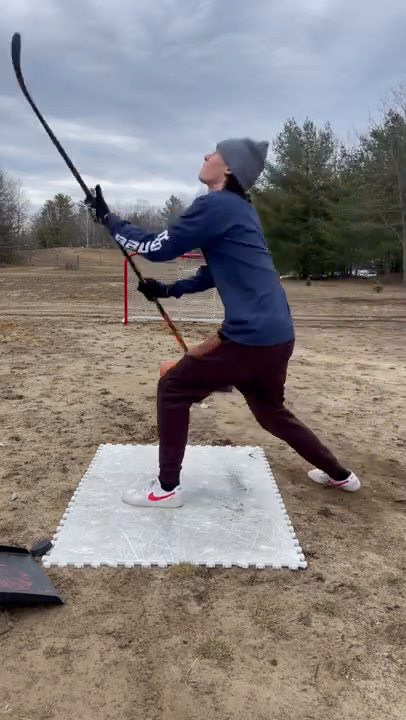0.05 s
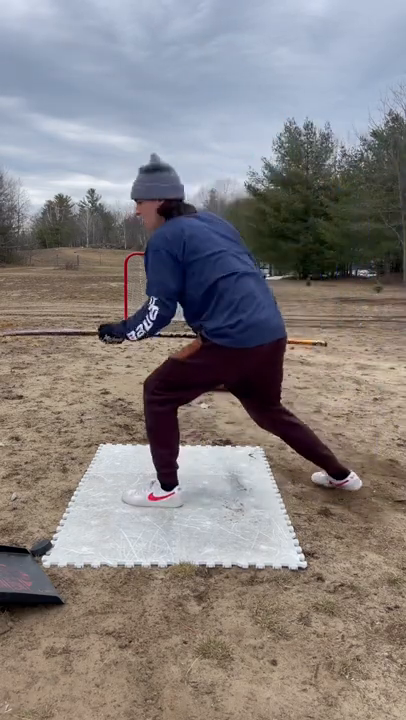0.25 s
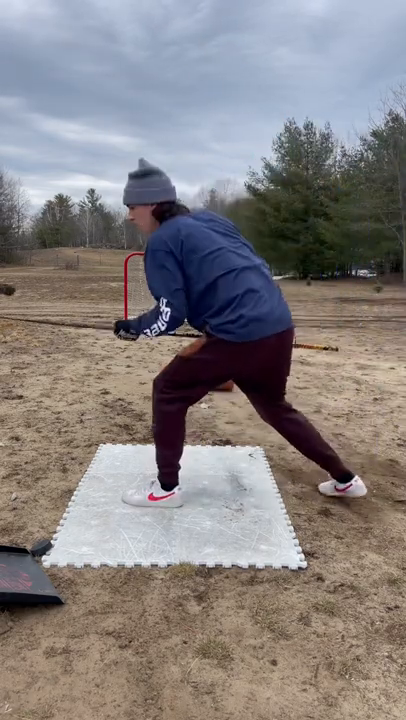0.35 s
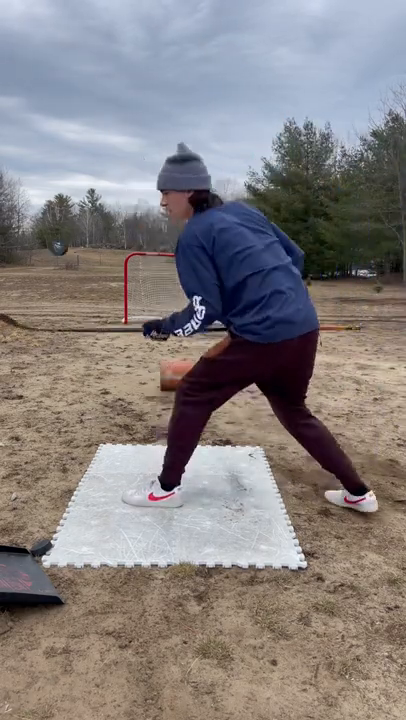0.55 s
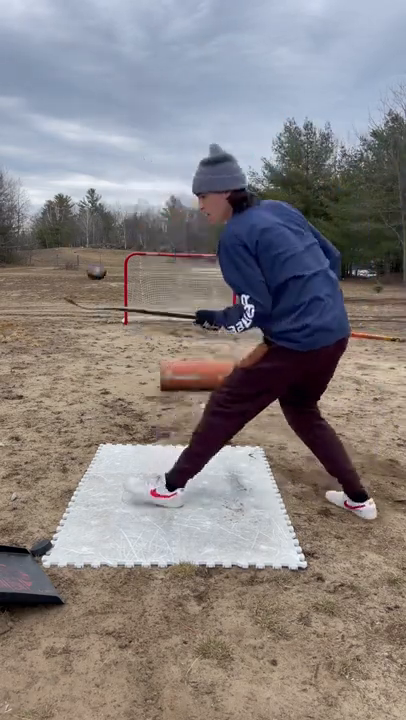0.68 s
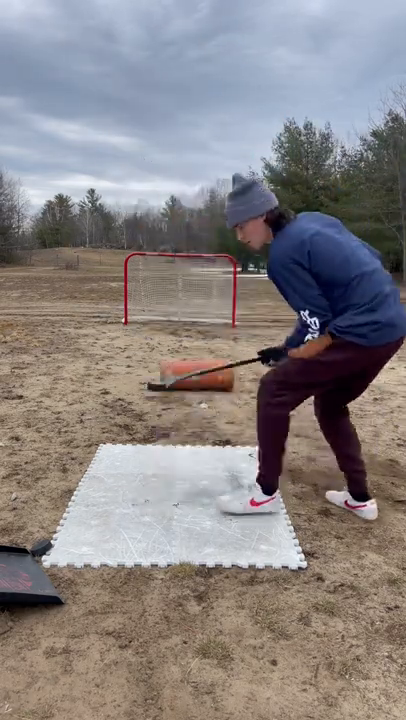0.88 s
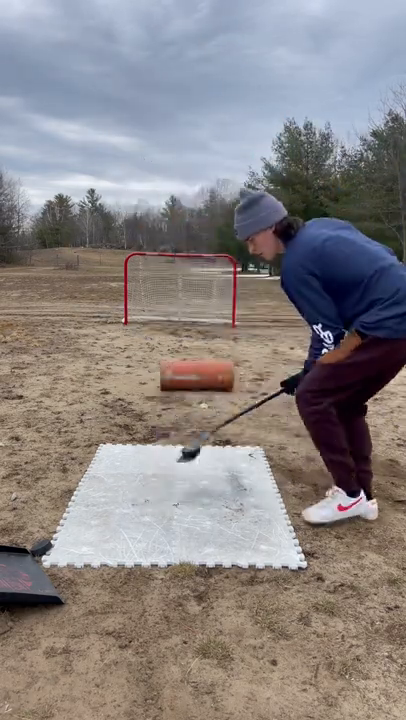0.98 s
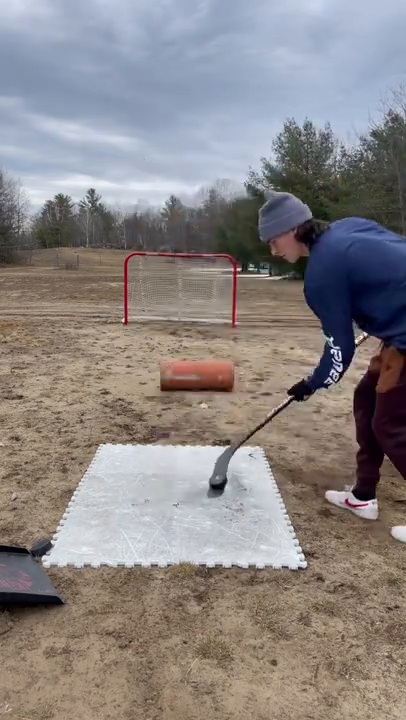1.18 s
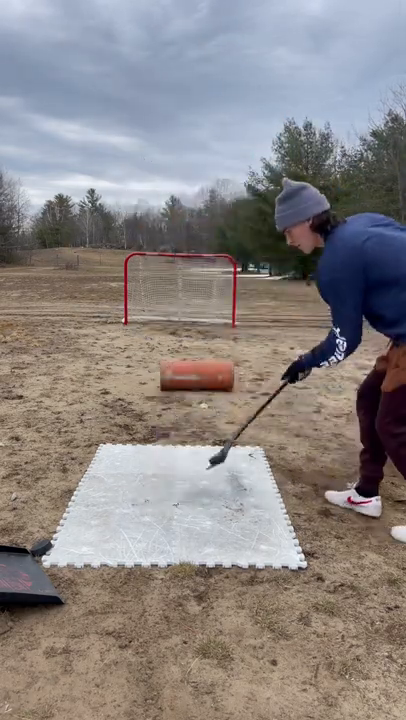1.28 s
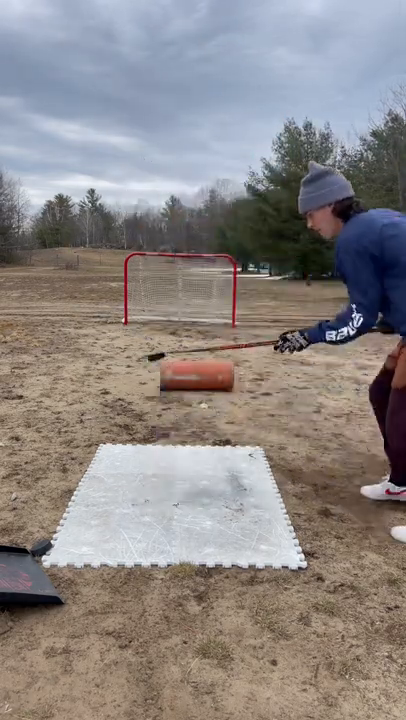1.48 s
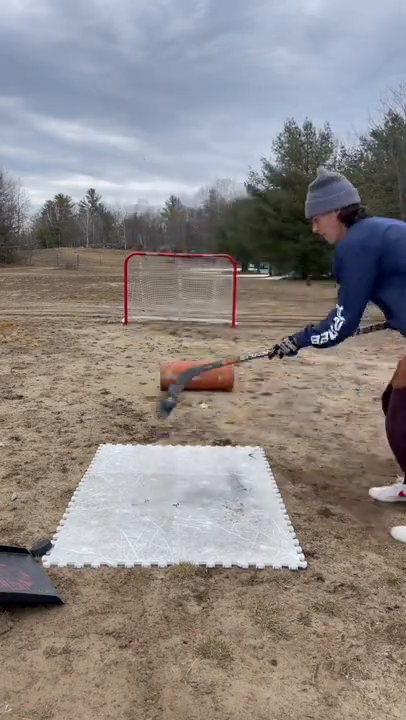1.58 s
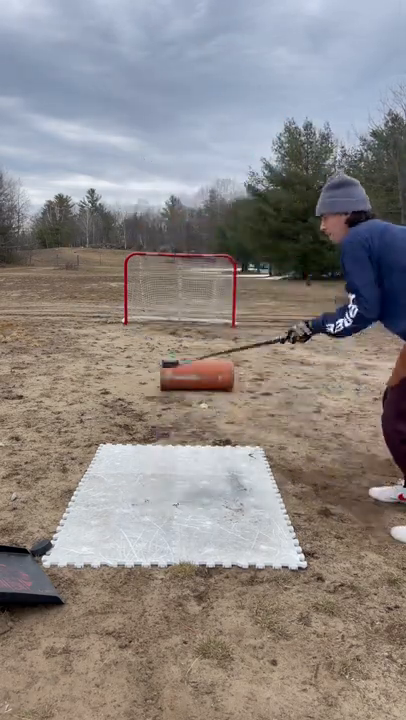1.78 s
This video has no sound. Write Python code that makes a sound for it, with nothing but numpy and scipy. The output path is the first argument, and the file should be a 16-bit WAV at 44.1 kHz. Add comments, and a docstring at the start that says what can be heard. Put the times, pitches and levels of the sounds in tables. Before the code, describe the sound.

A hockey stick hits a puck with a sharp double crack close to the microphone, then gives a lighter clack. The knocks echo briefly across an open field, with faint clothing rustle and low wind on the microphone.

```python
"""Stick and puck in an open field

Close to the microphone, a hockey stick bats a puck in the air: a hard double crack, then a lighter
clack as the blade meets it again. Each knock rings the stick and scatters off ground and trees.
Clothes and shoes rustle as the player turns. Low wind buffets the microphone over a far-off rush."""
import sys
import numpy as np
from scipy import signal
from scipy.fft import rfft, irfft
from scipy.io import wavfile
from scipy.ndimage import uniform_filter1d

SR = 44100
rng = np.random.default_rng(int(sys.argv[2]) if len(sys.argv) > 2 else 0)


def inscribe(sig):
    """Save sig as 16-bit PCM at rate SR to the path in sys.argv[1].

    A 1-D sig is mono; a 2-D sig holds one channel per row.
    Samples are clipped to [-1, 1] before scaling.
    """
    pcm = np.round(np.clip(np.atleast_2d(sig).T, -1, 1) * 32767)
    wavfile.write(sys.argv[1], SR, pcm.astype(np.int16))


N = 81585
TIME = np.arange(N) / SR
CRACK_RISE_S, TREBLE_HZ = 0.00052, 4500

# contacts on the stick, from hard puck hits to faint ticks:
# t/s, level/dB, place on the blade (0-1), body/dB, bite/dB, treble/dB, crack t60 at TREBLE_HZ/s
KNOCKS = [(0.1178, -45.5, 0.7, 6, -13, 5, 0.031), (0.234, -13, 0, -5, -3, -0.5, 0.018),
          (0.2364, -7, 0.05, 3.5, -5, 1.5, 0.016), (0.2429, -21.5, .4, -1.5, 8, 1, 0.027),
          (0.2556, -2, 0.65, 1, 0, -1.5, 0.024), (0.2593, -8, 1, -12, 6.5, -9, 0.02),
          (0.6769, -34.5, 0.75, -25, 2.5, -4, 0.01), (0.8283, -25, 0.99, -1, 0, 0.5, 0.027),
          (0.8314, -30.5, 0.26, 12, -19, -11, 0.025), (0.8432, -39, .8, -14, 1.5, -5, .022),
          (0.8455, -32.5, .8, 8, -0.5, -20, 0.078)]
# how alike distant sound is in the two channels: f/Hz, likeness (0-1)
FIELD_LIKENESS = [(150, 0.91), (350, 0.79), (700, 0.21), (1200, 0.31), (2300, 0.73), (5000, 0.14),
                  (10000, .1)]


def from_db(db):
    """Decibels to gain."""
    return 10 ** (np.asarray(db) / 20)


def unit_power(x):
    """Scale to an RMS of one."""
    return x / np.sqrt(np.mean(x ** 2) + 1e-20)


def in_time(points):
    """Read a curve at every sample."""
    return np.interp(TIME, *np.transpose(points))


def at_hz(points, hz):
    """Read a curve on a log-frequency axis."""
    f, value = np.transpose(points)
    return np.interp(np.log(np.maximum(hz, 1)), np.log(f), value)


def noise(spectrum):
    """Unit-power noise of a given colour, falling away below its lowest point."""
    hz = np.arange(N + 1) * SR / (2 * N)
    gain = from_db(at_hz(spectrum, hz)) * np.minimum(hz / spectrum[0][0], 1) ** 2
    return unit_power(irfft(rfft(rng.standard_normal(2 * N)) * gain)[:N])


def stereo_noise(spectrum, likeness):
    """Coloured noise with a left-right likeness per frequency."""
    alike = np.clip(at_hz(likeness, np.arange(N // 2 + 1) * SR / N), -1, 1)
    mid = np.sqrt((1 + alike) / 2) * rfft(noise(spectrum))
    side = np.sqrt((1 - alike) / 2) * rfft(noise(spectrum))
    return irfft([mid + side, mid - side], N)


def ring(clicks, hz, t60):
    """A unit click sets a sine of height 1 ringing."""
    r, w = from_db(-60 / (t60 * SR)), 2 * np.pi * hz / SR
    return signal.lfilter([0, np.sin(w)], [1, -2 * r * np.cos(w), r * r], clicks + 1e-18)


def burst(start, rise, hold, t60):
    """Envelope: linear rise, hold, exponential decay."""
    t = TIME - start
    return np.clip(t / rise, 0, 1) * np.exp(-np.log(1000) * np.clip((t - rise - hold) / t60, 0, 2))


def far_rush():
    """A wide steady rush, as of wind in trees or a distant road."""
    # loudness of the rush: t/s, level/dB
    level = [(0, -44.5), (.5, -44), (1.0, -44), (1.45, -44), (1.6, -45), (1.85, -44.5)]
    # its colour: f/Hz, relative level/dB
    colour = [(120, 10.5), (250, -5), (380, -4), (600, -6), (770, -1), (850, -2.5), (925, 5), (1000, -1),
              (1150, -3), (1700, -8.5), (2400, -15), (3400, -24), (4800, -39), (7000, -39.5), (9000, -54.5),
              (10500, -44), (12500, -60.5), (16000, -81)]
    return from_db(in_time(level)) * stereo_noise(colour, FIELD_LIKENESS)


def wind_on_microphone():
    """Gusts and short buffets over a steady rumble, nearly the same in both channels."""
    # strength of the gusts: t/s, level/dB
    gusts = [(0, -42), (.07, -39.5), (.14, -48), (.19, -35), (.3, -36), (.38, -40.5), (.46, -38.5),
             (.62, -42), (.72, -40), (.86, -44), (.92, -47.5), (1.03, -42.5), (1.2, -41), (1.42, -42),
             (1.56, -44), (1.66, -37), (1.71, -49.5), (1.76, -36.5), (1.85, -41.5)]
    # single buffets: t/s, peak level/dB
    buffets = [(0.323, -29), (1.069, -32), (1.121, -30), (1.19, -31), (1.247, -30.5), (1.377, -31.5),
               (1.437, -31.5), (1.515, -28.5)]
    # colour of gusts and buffets: f/Hz, relative level/dB
    wind_colour = [(20, -27), (32, -14.5), (48, -0.5), (64, 3), (88, -3), (120, -14), (170, -25),
                   (260, -32.5), (400, -43.5), (1500, -81.5)]
    # colour of the rumble: f/Hz, relative level/dB
    rumble_colour = [(45, -13.5), (65, 1.5), (90, 4), (125, -1.5), (160, -5.5), (220, -14), (350, -25),
                     (800, -67)]
    likeness, buffet_s = [(1, 0.99)], 0.011
    air = stereo_noise(wind_colour, likeness)
    air /= np.sqrt(uniform_filter1d(np.mean(air ** 2, axis=0), int(.025 * SR)))  # even out over 25 ms
    buffet_power = sum(from_db(db) ** 2 * np.exp(-((TIME - t) / buffet_s) ** 2) for t, db in buffets)
    force = np.sqrt(from_db(in_time(gusts)) ** 2 + buffet_power)
    return force * air + from_db(-47.5) * stereo_noise(rumble_colour, likeness)


def field_echo():
    """The ground scatters the knocks at once; the trees answer later and longer."""
    # colour of the scatter: f/Hz, relative level/dB
    colour = [(150, 17), (700, -7.5), (2500, 3), (5000, -8), (7000, -9), (9000, -37), (10500, -32),
              (13000, -43)]
    power = 0
    for t, db, *_ in KNOCKS:
        ground = from_db(db - 49.5) * burst(t, CRACK_RISE_S, hold=0, t60=.3)
        trees = from_db(db - 52) * burst(t + 0.056, rise=0.055, hold=0, t60=1)
        power += ground ** 2 + trees ** 2
    return np.sqrt(power) * stereo_noise(colour, FIELD_LIKENESS)


def rustle():
    """Each slide of cloth or sole swells and fades: a soft hiss with fine sandy grit on top."""
    # slides: peak t/s, rise/s, fall/s, hiss level/dB, grit level/dB
    scuffs = [(0.04, 0.19, 0.038, -62.5, -61.5), (0.381, 0.15, 0.072, -68, -74.5),
              (0.68, 0.026, 0.026, -65, -65.5), (0.765, 0.02, 0.015, -63.5, -60.5),
              (0.82, 0.0087, 0.0052, -58, -57), (0.883, 0.012, 0.03, -68, -77),
              (1.109, 0.023, 0.049, -63, -60), (1.25, .025, 0.026, -66.5, -73.5),
              (1.334, 0.015, .025, -65, -73), (1.50, 0.039, 0.026, -68, -71),
              (1.71, .025, .025, -73.5, -82.5), (1.835, 0.019, .04, -67, -78.5)]
    # colour of the hiss: f/Hz, relative level/dB
    hiss_colour = [(2000, 2), (3500, -1.5), (4800, -0.5), (5800, 1.5), (7200, -4), (8200, -1), (9100, -23),
                   (12000, -34)]
    # colour of the grit: f/Hz, relative level/dB
    grit_colour = [(8000, -25.5), (9400, -16), (10000, 6), (11000, -5), (11800, -17.5), (13000, -24.5),
                   (15000, -39.5)]
    grains_per_s, grain_db = 900, 2
    grains = rng.standard_normal(int(grains_per_s * N / SR))
    flicker = from_db(grain_db * np.interp(TIME * grains_per_s, np.arange(len(grains)), grains))
    hiss, grit = 0, 0
    for t, rise, fall, hiss_db, grit_db in scuffs:
        swell = np.exp(-.5 * ((TIME - t) / np.where(TIME < t, rise, fall)) ** 2)
        hiss += from_db(hiss_db) * swell
        grit += from_db(grit_db - 2.5) * swell
    return flicker * (hiss * noise(hiss_colour) + grit * noise(grit_colour))


def knock_gains(hz):
    """Strength of each knock at one frequency: a low shelf, a bell and a high shelf shape it."""
    _, db, _, body_db, bite_db, treble_db, _ = np.transpose(KNOCKS)
    body = 1 / (1 + (hz / 1200) ** 4)
    bite = np.exp(-(np.log2(hz / 2947) / .5) ** 2)
    treble = 1 / (1 + (TREBLE_HZ / hz) ** 4)
    return from_db(db + body_db * body + bite_db * bite + treble_db * treble)


def stick_ring():
    """Each knock rings the stick's modes, weighted by where the puck lands."""
    # modes of the stick: f/Hz, level struck at place 0/dB, level struck at place 1/dB, t60/s
    modes = [(252, -29, -28, 0.079), (636, -0.5, -20.5, 0.034), (770, -16, -7.5, 0.039),
             (1011, -11.5, -2, .035), (1250, -11, -9, 0.0353), (1701, -12.5, -10.5, .03),
             (1902, 2, -13.5, 0.023), (2152, -7.5, -10, .03), (2420, -19.5, -9.5, 0.029),
             (2914, -18.5, 1, 0.017), (3193, -24.5, -4.5, 0.014), (3690, -16, -16, 0.015),
             (4010, -18, -10, 0.016), (4216, -22, -9.5, .025), (5127, -6, -17, .02),
             (5867, -14, -13.5, .022), (6670, -20, -14.5, 0.017), (10205, -6, -8, 0.0098),
             (10850, -23.5, -17, 0.0074)]
    times, _, place, *_ = np.transpose(KNOCKS)
    contact_s, out = .0004, np.zeros(N)
    for k, (hz, db_0, db_1, t60) in enumerate(modes):
        clicks = np.zeros(N)
        clicks[(times * SR).astype(int)] = knock_gains(hz) * from_db(db_0 + place * (db_1 - db_0))
        # taking away a fast-dying ring lets the mode build up during the contact
        mode = ring(clicks, hz, t60) - ring(clicks, hz, contact_s * np.log(1000))
        out += (-1) ** k * mode
    return from_db(-4.5) * out


def blade_crack():
    """A sharp snap, then countless close modes of the blade's shell: a noise burst in each band."""
    # colour of the crack: f/Hz, relative level/dB
    spectrum = [(100, 0), (250, -1.5), (420, -9), (750, 8.5), (1500, -3), (3000, -3), (5500, 0.5),
                (7500, -11.5), (9100, -12), (10500, -3.5), (11600, -16), (12600, -37), (15000, -48)]
    shell_db, snap_db, hold_s = -7, 3, 0.00064
    times, *_, t60s = np.transpose(KNOCKS)
    edges = np.geomspace(100, 15000, 21)
    centres = np.sqrt(edges[1:] * edges[:-1])
    colour = from_db(at_hz(spectrum, centres))
    share = colour * np.sqrt(np.diff(edges))
    share /= np.linalg.norm(share)
    out = np.zeros(N)
    for k, hz in enumerate(centres):
        band = signal.butter(2, edges[k:k + 2], "band", fs=SR, output="sos")
        gains, clicks = knock_gains(hz), np.zeros(N)
        clicks[(times * SR).astype(int)] = gains
        snap = (-1) ** k * signal.sosfilt(band, clicks + 1e-18)
        stretch = (TREBLE_HZ / hz) ** 0.25  # the lows rise more slowly and last longer
        power = sum((gain * burst(t, CRACK_RISE_S * stretch, hold_s, t60 * stretch)) ** 2
                    for t, gain, t60 in zip(times, gains, t60s))
        shell = np.sqrt(power) * unit_power(signal.sosfilt(band, rng.standard_normal(N)))
        out += from_db(shell_db) * share[k] * shell + from_db(snap_db) * colour[k] * snap
    return out


def from_the_left(x):
    """A near source reaches the microphone's left port a little before the right."""
    # lag of the right port: f/Hz, phase/rad
    port_phase = [(0, 0), (2070, 0.45), (3300, 1.0), (3900, 0.65), (4700, 2.1), (5150, 4.7), (5770, 6.2),
                  (9100, 9.4), (10900, 11.1), (11400, 12.0), (12100, 12.55), (14000, 12.6)]
    lag = np.interp(np.arange(N + 1) * SR / (2 * N), *np.transpose(port_phase))
    left = rfft(x, 2 * N)
    return irfft([left, left * np.exp(-1j * lag)])[:, :N]


def scene():
    """Player and stick close by on the left, the open field all around."""
    player = stick_ring() + blade_crack() + rustle()
    return from_the_left(player) + field_echo() + wind_on_microphone() + far_rush()


def record(dry):
    """The microphone's top rolls off, peaks are rounded, the ends fade, the highest treble is cut."""
    mic_top_hz, cutoff_hz, fade_s = 11130, 15000, .004
    heard = signal.sosfilt(signal.butter(12, mic_top_hz, fs=SR, output="sos"), dry)
    fade = np.clip(np.minimum(TIME, TIME[::-1]) / fade_s, 0, 1)
    treble_cut = signal.cheby2(12, 70, cutoff_hz, fs=SR, output="sos")
    return signal.sosfilt(treble_cut, fade * np.tanh(heard))


dry = scene()
out = record(dry)
inscribe(out)
```